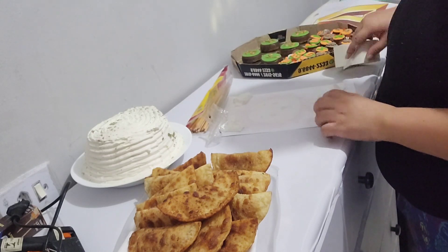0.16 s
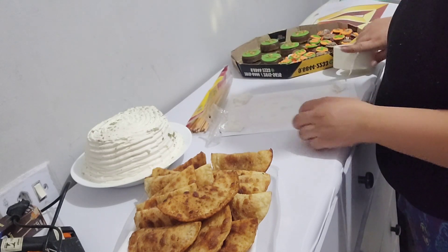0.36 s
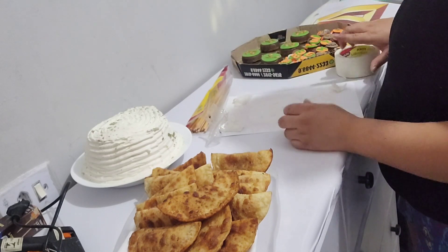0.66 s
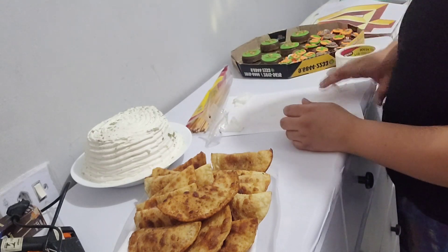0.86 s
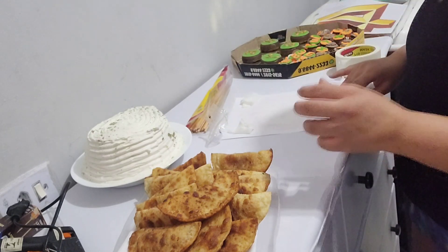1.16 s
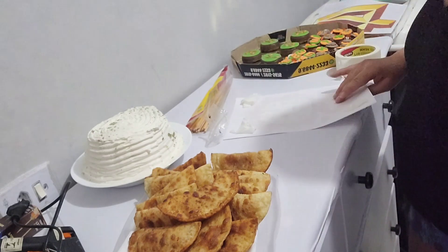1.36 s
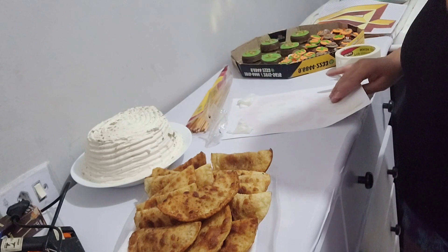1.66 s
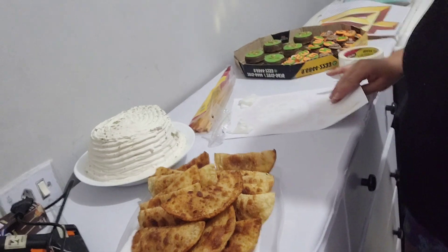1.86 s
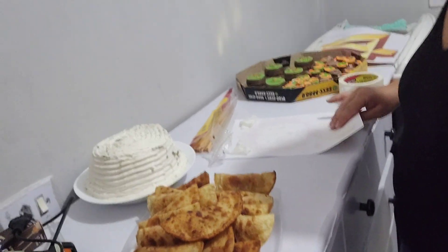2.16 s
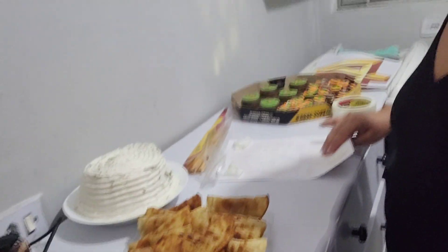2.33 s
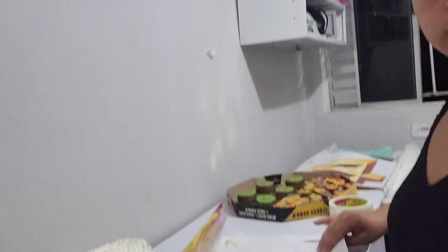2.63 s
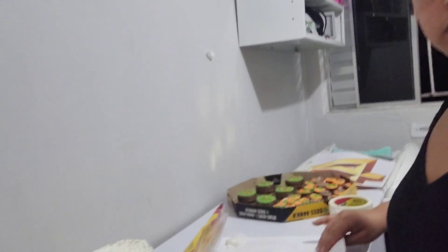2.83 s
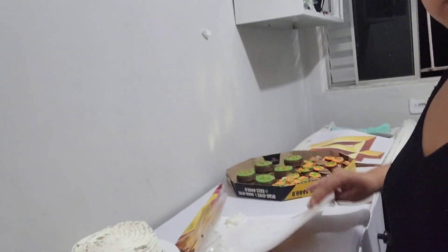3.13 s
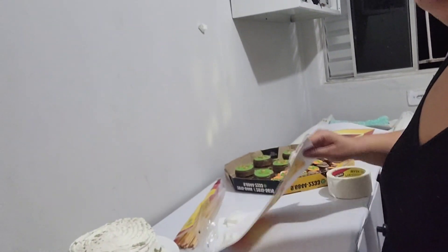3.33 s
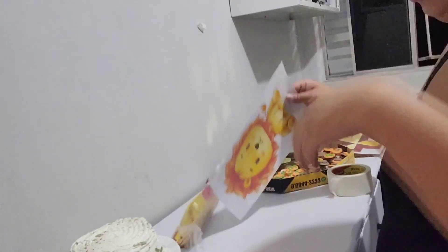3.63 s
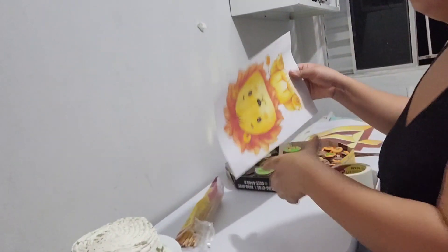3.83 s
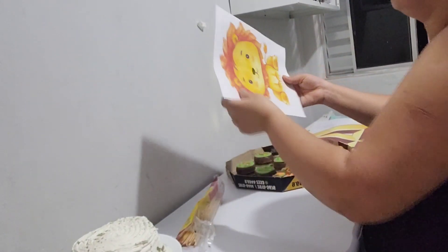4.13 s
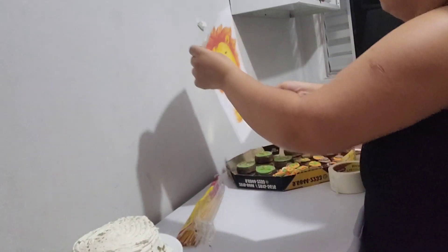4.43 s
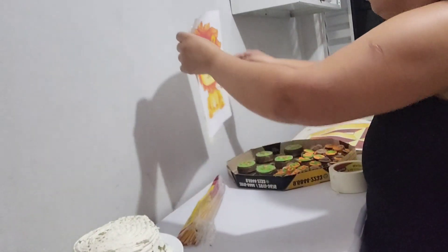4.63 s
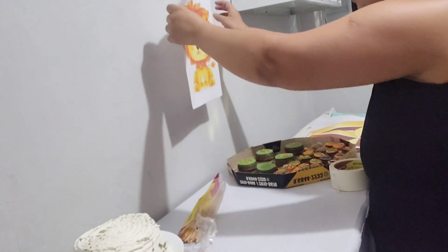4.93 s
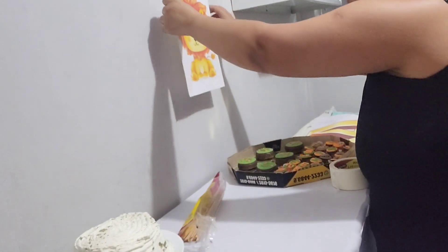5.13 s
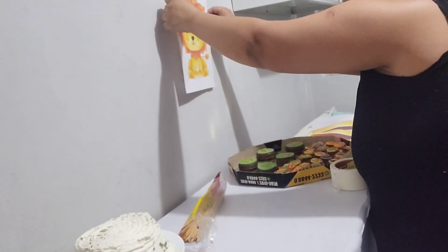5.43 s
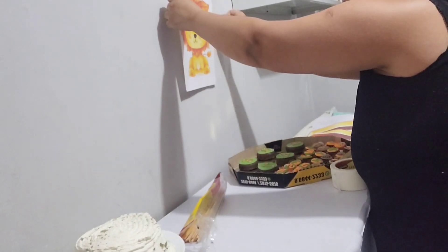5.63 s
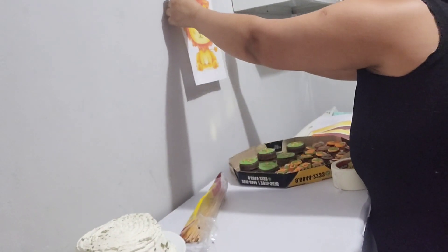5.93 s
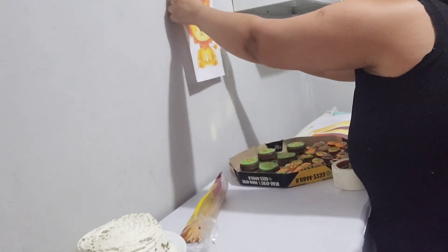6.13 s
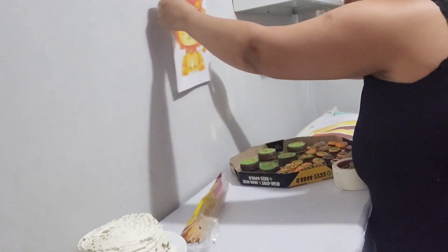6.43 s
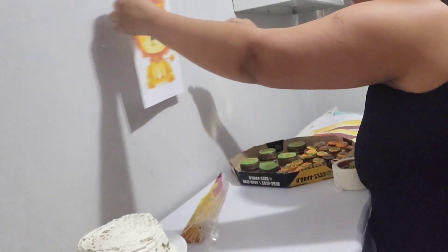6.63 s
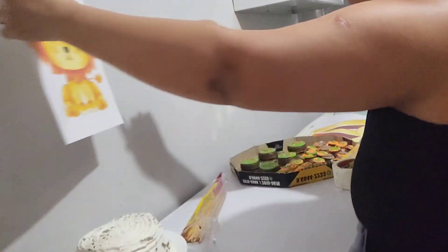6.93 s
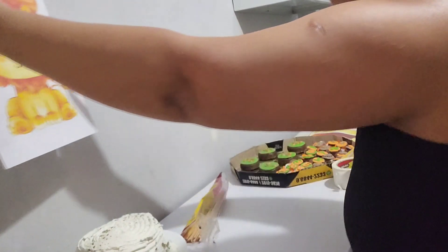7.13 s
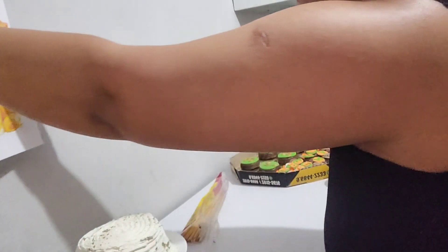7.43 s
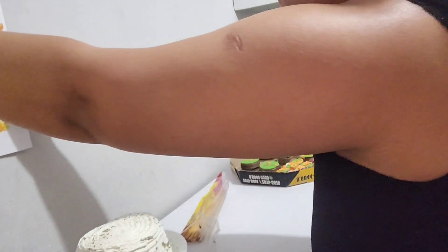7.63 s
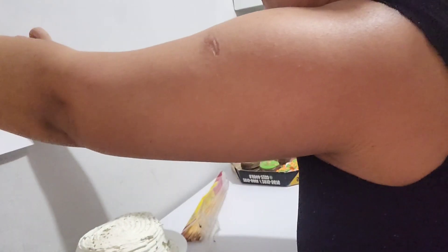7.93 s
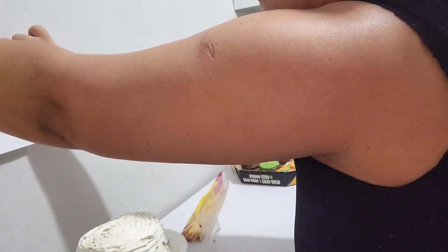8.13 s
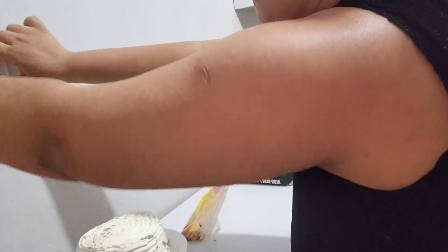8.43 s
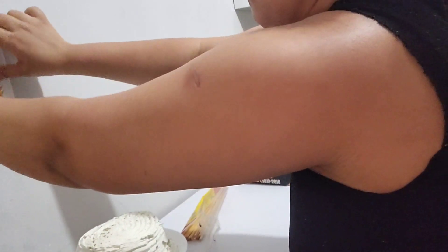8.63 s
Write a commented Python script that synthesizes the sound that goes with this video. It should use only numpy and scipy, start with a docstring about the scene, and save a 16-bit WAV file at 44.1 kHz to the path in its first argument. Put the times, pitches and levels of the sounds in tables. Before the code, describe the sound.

In a small, bare room with quiet air and a low throbbing rumble, a roll of tape knocks on a table and wobbles to rest in a quick hollow clatter. Paper scrapes softly, fingers tick against the hand-held phone, then the sheet peels up with sharp snaps and a bright rustle. Later come sparse brushes, crackles and light taps as it is smoothed onto the wall.

```python
"""A low, throbbing rumble and still air last throughout, in a small, bare room around a hand-held phone.
A roll of packing tape knocks on a table and wobbles to rest: damped modes struck by each contact.
A sheet of paper with tape on its edges is peeled off the tablecloth, lifted and smoothed onto the wall:
grains of friction make its slides and brushes, sudden buckling its snaps. Fingers tick on the phone's
case, mostly stronger at one microphone, and later tap on the wall, nearly centred: damped pulses."""
import sys
import numpy as np
from scipy import signal
from scipy.fft import rfft, irfft, next_fast_len
from scipy.io import wavfile

SR = 44100
rng = np.random.default_rng(int(sys.argv[2]) if len(sys.argv) > 2 else 0)


def waveform_to_disk(signal):
    """Save audio, clipped to [-1, 1], as 16-bit WAV at the path in sys.argv[1]."""
    frames = np.transpose(np.atleast_2d(signal))
    scaled = np.clip(frames, -1, 1) * 32767
    samples = np.round(scaled).astype(np.int16)
    wavfile.write(sys.argv[1], SR, samples)


N = 387198
TIME = np.arange(N) / SR


def undb(db):
    """Amplitude ratio of a level: 20 dB is a factor of ten."""
    return 10 ** (np.asarray(db) / 20)


def unit(x):
    """Normalise to a root-mean-square of 1."""
    return x / np.sqrt(np.mean(x ** 2))


def lookup(points, hz):
    """Read (Hz, value) points on a logarithmic frequency axis, as hearing spaces pitch."""
    f, value = np.transpose(points)
    return np.interp(np.log(hz + 1), np.log(f), value)


def freqs(x):
    """Frequencies in Hz of the discrete spectrum of x."""
    return np.fft.rfftfreq(x.shape[-1], 1 / SR)


def noise(points, size=N, alike_hz=900):
    """Coloured stereo noise: spatial coherence is higher for long waves than for short ones."""
    length = next_fast_len(size, True)
    mid, side = rng.standard_normal((2, length))
    f = freqs(mid)
    apart = np.clip(f / alike_hz, .3, 1)
    mid, side = rfft(mid), rfft(side) * apart
    spectra = np.array([mid + side, mid - side]) * undb(lookup(points, f))
    return unit(irfft(spectra, length)[:, :size])


def walk(rate):
    """Band-limited fluctuation: normal random values, rate per second, joined by straight lines."""
    knots = rng.standard_normal(int(N / SR * rate) + 2)
    return np.interp(TIME * rate, np.arange(len(knots)), knots)


def fade(t, t60):
    """Exponential decay of a damped system: 60 dB in t60 seconds."""
    return undb(-60 * t / t60)


def swell(t, width_s):
    """Gaussian envelope: a smooth rise and fall around t = 0, with this standard deviation."""
    return np.exp(-.5 * (t / width_s) ** 2)


def pan(db):
    """Level difference between left and right (dB), at constant power."""
    gains = undb(np.array([[db], [-db]]) / 2)
    return unit(gains)


def add(out, s, sound):
    """Superpose a sound that begins at s seconds."""
    start = int(s * SR)
    out[:, start:start + sound.shape[1]] += sound[:, :N - start]


def ring(modes, t, scatter_db, apart_hz):
    """Modal superposition after a blow; short waves reach the two microphones further out of phase."""
    hz, db, t60 = np.transpose(modes)[:, :, None]
    chance = rng.standard_normal((3, len(modes), 1))
    phase = chance[1:] * np.minimum(hz / apart_hz, 2)
    amplitude = undb(db + scatter_db * chance[0]) * fade(t, t60)
    return np.sum(amplitude * np.sin(2 * np.pi * hz * t + phase), axis=1)


def room(x, build_s=0.001):
    """Diffuse reverberation of hard, close walls, with unit energy and a decay time for each band."""
    # Each row: frequency in Hz, decay time t60 in seconds.
    decay_times = [(150, 0.35), (1000, 0.25), (4000, 0.25), (8000, 0.11), (15000, 0.31)]
    t = np.arange(SR // 2) / SR
    edges = np.geomspace(80, 18000, 9)
    tail = 0
    for lo, hi in zip(edges, edges[1:]):
        bandpass = signal.butter(3, [lo, hi], "band", fs=SR, output="sos")
        band = signal.sosfilt(bandpass, rng.standard_normal((2, len(t))))
        tail = tail + band * fade(t, lookup(decay_times, np.sqrt(lo * hi)))
    build_up = 1 - np.exp(-(t / build_s) ** 2)
    tail = unit(tail * build_up) / np.sqrt(len(t))
    return signal.fftconvolve(x, tail, axes=1)[:, :N]


def room_tone(air_db=-58.5, echo_db=-7, waver_hz=2.463):
    """Broadband air noise with its reverberation, and narrow hum notes wavering in pitch and level."""
    # Colour of the steady air. Each row: frequency in Hz, relative level in dB.
    air_colour = [(25, -5.5), (60, 17.5), (130, -1.5), (280, 0), (450, -4.5), (720, -2.5), (1100, -15.5),
                  (2000, -27), (3500, -53), (6500, -63), (9000, -34), (16000, -54)]
    # Faint hum in the room. Each row: frequency in Hz, middle level in dB (the first note is shaped below).
    hum = [(177.6, -73.5), (264, -77), (300, -75), (447, -81.5), (528, -78.5)]
    air = noise(air_colour)
    air = unit(air + undb(echo_db) * room(air)) * undb(air_db + 1.0 * walk(5))
    notes = []
    for hz, db in hum:
        level = np.sqrt(2) * undb(db + 5.2 * walk(6))
        phase = 2 * np.pi * np.cumsum(hz + waver_hz * walk(12)) / SR
        notes.append(level * np.sin(phase))
    # the lowest note is held back a little and swells once, at 6.7 s
    lowest_gain = undb(-3.5) + undb(12.5) * swell(TIME - 6.7, .12)
    return air + notes[0] * lowest_gain + sum(notes[1:])


def rumble(boom_hz=57, wander_hz=6, boom_db=-1, waver_db=3, throb_s=0.034,
           upper_db=-59, upper_follows=0.64, upper_limit_db=-49, upper_waver_db=1.14):
    """Frequency and amplitude modulation: a deep boom wavers and throbs; a broad band follows it gently."""
    # Bed of the boom, before boom_db. Each row: time in seconds, level in dB.
    bed_levels = [(0, -60), (.9, -49.5), (1.2, -52), (1.35, -98), (1.6, -53.5), (2.8, -55), (4.4, -55),
                  (5.1, -63.5), (5.55, -63.5), (6.05, -64), (6.6, -54), (7.9, -51), (8.25, -47),
                  (8.65, -42.5)]
    # Strongest throbs, before boom_db. Each row: time of the peak in seconds, level in dB.
    throbs = [(0.98, -46), (1.16, -46), (1.61, -50), (1.88, -45.5), (2.21, -44), (2.62, -45.5),
              (2.76, -49.5), (2.98, -46), (3.13, -45), (3.54, -41.5), (4.151, -42), (4.28, -45.5),
              (4.5, -47), (4.91, -49), (5.49, -47.5), (5.59, -46), (6.26, -45.5), (6.42, -40.5),
              (7.02, -42), (7.28, -47.5), (7.43, -47.5), (7.8, -43), (8.5, -45)]
    # Colour of the upper rumble. Each row: frequency in Hz, relative level in dB.
    upper_colour = [(20, -12), (40, -29), (80, 11), (115, 10.5), (175, -2), (220, -3.5), (290, 5),
                    (500, -7), (900, -37)]
    bed = undb(np.interp(TIME, *np.transpose(bed_levels)) + waver_db * walk(14))
    throb_power = sum((undb(db) * swell(TIME - s, throb_s)) ** 2 for s, db in throbs)
    level = np.sqrt(bed ** 2 + throb_power)
    phase = 2 * np.pi * np.cumsum(boom_hz + wander_hz * walk(22)) / SR
    boom = np.sqrt(2) * np.sin(phase) * level * undb(boom_db)
    # a limit and an exponent below 1 compress the throbs
    followed = np.minimum(level, undb(upper_limit_db)) ** upper_follows
    upper_envelope = unit(followed * undb(upper_waver_db * walk(12)))
    upper = noise(upper_colour) * upper_envelope * undb(upper_db)
    return boom * pan(-2.8) + upper


def paper_slide(hiss_db=0, scrape_db=-2, held_db=-83.5, rise_share=0.3, runout_t60=0.31,
                grain_db=5, flutter_db=2, room_db=1, sheen_hz=8000, brisk_db=-62,
                crinkles_per_s=35, crinkle_db=10, crinkle_t60=0.0039, drift_db=2):
    """Stick-slip friction: fibres release a dense stream of grains, with crinkles standing out at random."""
    # Paper on cloth, fingers and wall. Each row: start in seconds, length in seconds,
    # hiss level in dB and scrape level in dB (before hiss_db and scrape_db).
    slides = [(0.122, 0.49, -65.5, -59.5), (0.237, 0.18, -55, -58.5), (0.694, 0.11, -71, -77),
              (0.947, 0.12, -62, -63), (1.71, 0.33, -75.5, -70), (2.32, 0.19, -74, -66),
              (2.524, .19, -66.5, -65.5), (2.738, 0.15, -90, -68), (3.121, 0.13, -65, -63),
              (3.268, .2, -71, -63), (3.43, 0.35, -56, -55), (3.88, 0.057, -67, -56),
              (4.045, 0.27, -59.5, -57.5), (4.333, 0.18, -68.5, -71), (4.667, .2, -70.5, -70.5),
              (5.028, 0.19, -73, -81), (5.237, 0.2, -60.5, -86), (5.433, 0.062, -53, -54.5),
              (5.74, 0.14, -69.5, -72), (6.14, .54, -65.5, -76), (6.575, 0.29, -65, -68.5),
              (6.746, 0.1, -56.5, -76), (7.05, 0.16, -79.5, -88), (7.322, 0.074, -76, -88),
              (7.585, 0.5, -72, -62.5), (7.684, .07, -67, -63.5), (8.137, 0.11, -58, -63),
              (8.275, .2, -63, -79), (8.521, 0.22, -57, -63)]
    # Colours of the light hiss and the firmer scrape. Each row: frequency in Hz, relative level in dB.
    hiss_colour = [(1500, -2), (3000, -4), (4800, 6.5), (6500, 4.5), (8500, 0), (12000, 3.5), (16000, -2.5)]
    scrape_colour = [(300, 17.5), (700, 2), (1400, 8.5), (2600, -1), (4000, -4), (8000, -16)]
    # the sheet whispers even when it is only held
    power = np.full((2, N), undb(held_db) ** 2)
    for s, length, *levels in slides:
        t = np.arange(int((length + runout_t60) * SR)) / SR
        rise = np.minimum(t / (rise_share * length), 1)
        shape = rise * fade(np.maximum(t - length, 0), runout_t60)
        add(power, s, (undb(levels)[:, None] * shape) ** 2)
    out = 0
    for colour, level, trim_db in zip((hiss_colour, scrape_colour), np.sqrt(power), (hiss_db, scrape_db)):
        catches = (rng.random(N) < crinkles_per_s / SR) * rng.exponential(size=N)
        crinkles = signal.lfilter([undb(crinkle_db)], [1, -fade(1 / SR, crinkle_t60)], catches)
        unevenness = undb(grain_db * walk(900) + flutter_db * walk(45))
        grains = unit(noise(colour) * (unevenness + crinkles))
        brisk = unit(grains + undb(room_db) * room(grains))
        # a slow slide, taken as a quiet one, has less above sheen_hz
        slow = irfft(rfft(brisk) / (1 + (freqs(brisk) / sheen_hz) ** 8), N)
        speed = np.minimum((level / undb(brisk_db)) ** .25, 1)
        # brightness also drifts at random, for the changing angle of the sheet
        brightness = speed * undb(drift_db * walk(9))
        out = out + (slow + brightness * (brisk - slow)) * level * undb(trim_db)
    return out


def tape_roll(clack_db=-4, clack_t60=0.048, room_db=-17, clack_room_db=0):
    """Impact excitation of modes: the table booms, the cardboard core rings, the contact clacks."""
    # The rim meets the table. Each row: time in seconds, table drive in dB, core drive in dB,
    # corner in Hz above which the contact excites the modes less and less (capped at SR / 4).
    knocks = [(0.122, -23, -24, 6000), (0.1331, -31, -36.5, 3020), (0.5421, -26, -23, 2630),
              (0.5541, -24, -32.5, 700), (0.5671, -59, -36, 2200), (0.5945, -25.5, -32, 2800),
              (0.619, -45, -38, 1100), (0.654, -28, -25.5, 1040), (0.6905, -33.5, -33.5, 1010),
              (0.703, -35, -26, 700), (0.729, -47, -36, 2260), (0.7431, -27, -23.5, 1160),
              (0.7616, -31.5, -29, 1270), (0.769, -33, -48, 1500), (0.785, -47, -42, 1330),
              (0.802, -38.5, -45, 1300), (1.789, -44, -45, 900), (1.951, -46.5, -41, 905)]
    # Modes of the table top. Each row: frequency in Hz, middle level in dB, t60 in seconds.
    table_modes = [(58.2, -7.5, 0.38), (116, -19, 0.51), (141.2, -4, 0.28), (166.5, 1, 0.24),
                   (257.8, -12, 0.23), (280.5, -9.5, 0.094)]
    # Modes of the cardboard core. Each row: frequency in Hz, middle level in dB, t60 in seconds.
    core_modes = [(340, -3.5, 0.15), (423, -5.5, 0.089), (436, -4.5, 0.097), (467, -2.5, 0.051),
                  (497, -15, 0.13), (565, -21, 0.12), (723, -16, 0.15), (763, -9.5, 0.2), (897, -17.5, 0.3),
                  (916, -20.5, 0.14), (1240, -28, 0.11), (1550, -26, 0.086)]
    # Colour of the crowd of short-lived modes. Each row: frequency in Hz, relative level in dB.
    clack_colour = [(100, -3), (250, 6.5), (500, 5), (1000, -4.5), (2000, -8), (3500, -14.5), (7000, -22.5),
                    (15000, -27)]
    dry, send = np.zeros((2, N)), np.zeros((2, N))
    t = np.arange(int(SR * .4)) / SR
    onset = 1 - np.exp(-t / 0.0018)
    for s, table_db, core_db, contact_hz in knocks:
        top = undb(table_db) * ring(table_modes, t, scatter_db=3.5, apart_hz=796)
        core = undb(core_db) * ring(core_modes, t, scatter_db=2.5, apart_hz=734)
        clack = undb(core_db + clack_db) * noise(clack_colour, len(t)) * fade(t, clack_t60)
        # a soft, rolling contact leaves the high modes nearly still
        contact = signal.butter(2, min(contact_hz, SR / 4), fs=SR, output="sos")
        body, clack = signal.sosfilt(contact, onset * np.array([top + core, clack]))
        add(dry, s, body + clack)
        add(send, s, undb(room_db) * body + undb(clack_room_db) * clack)
    return (dry + room(send)) * pan(-.4)


def paper_brushes(grain_db=5, width_octaves=0.88, dry_db=-4, wet_db=-2):
    """Granular friction noise: short strokes, flaps and pats swell and sink, each around its own pitch."""
    # Each row: time of the peak in seconds, level in dB (before dry_db and wet_db), centre in Hz,
    # standard deviation of the swell in seconds.
    brushes = [(0.48, -49, 6800, 0.004), (0.985, -51.5, 8540, 0.023), (1.97, -54, 1300, 0.02),
               (2.455, -56.5, 7950, 0.0095), (3.03, -70, 900, 0.083), (3.257, -53, 1020, 0.013),
               (3.409, -60.5, 700, 0.013), (3.57, -45.5, 6950, 0.014), (3.563, -44, 383, 0.0081),
               (3.655, -54.5, 620, 0.012), (3.925, -55, 596, 0.0089), (4.269, -53, 350, 0.011),
               (5.299, -65, 5850, .026), (5.477, -51, 5330, 0.012), (5.77, -49.5, 11900, 0.0063),
               (5.979, -65, 6500, 0.034), (6.141, -51, 3800, 0.015), (6.655, -53, 3970, 0.0051),
               (7.732, -54.5, 10100, 0.0082), (7.78, -65.5, 2300, 0.014), (7.977, -55.5, 4940, .012),
               (8.041, -48, 119, 0.011), (8.156, -53.5, 3360, 0.017), (8.204, -45.5, 2580, .014),
               (8.401, -50, 119, 0.025), (8.69, -56.5, 2600, 0.049)]
    out = np.zeros((2, N))
    for s, db, hz, swell_s in brushes:
        t = np.arange(-SR // 6, SR // 6) / SR
        white = rng.standard_normal((2, len(t)))
        colour = swell(np.log2((freqs(white) + 1) / hz), width_octaves)
        uneven = white * undb(grain_db * walk(700)[:len(t)])
        grains = unit(irfft(rfft(uneven) * colour, len(t)))
        add(out, s + t[0], undb(db) * grains * swell(t, swell_s))
    return undb(dry_db) * out + undb(wet_db) * room(out)


def paper_snaps(ring_db=-7.5, wet_db=-4, click_db=3.5, click_t60=0.00084, crinkle_db=4):
    """Snap-through buckling: a sharp click, a crinkle and a papery ring, answered by the walls."""
    # The sheet buckles or the tape lets go. Each row: time in seconds, level in dB, pitch in Hz
    # that sets the band, t60 of the crinkle in seconds, left minus right in dB.
    snaps = [(0.965, -50, 8400, 0.051, -10), (1.892, -56, 3930, .006, 3), (2.3208, -38.5, 2400, 0.0071, -3),
             (2.347, -41.5, 2700, .008, 1), (2.370, -38, 8400, .003, 10), (2.492, -59, 9000, .006, 4),
             (2.6456, -36, 3700, 0.0085, 4), (3.541, -37, 7000, 0.09, 1), (3.556, -37, 4000, 0.076, 0),
             (3.637, -28.5, 2880, 0.016, 2), (3.7059, -46, 3060, 0.02, 10), (3.7553, -46, 6800, .03, -8),
             (3.765, -43.5, 2900, 0.024, -5), (3.894, -58.5, 5900, 0.068, 4), (4.261, -43, 2800, 0.08, 1),
             (5.453, -47, 7300, 0.069, -15), (5.756, -58, 12000, 0.052, -14),
             (6.1332, -36.5, 5500, 0.013, -2), (7.698, -55.5, 5850, 0.05, 11), (7.728, -49, 3950, 0.034, 0),
             (8.028, -49.5, 6500, 0.012, 6)]
    # Ring of the sheet before it bends. Each row: frequency in Hz, middle level in dB, t60 in seconds.
    sheet_modes = [(970, -6.5, 0.026), (1380, -12, 0.014), (2200, -7, 0.0065), (2920, -2, 0.0051),
                   (4210, -10.5, 0.026), (4860, -7, 0.0077), (5195, -7, .01)]
    dry, send = np.zeros((2, N)), np.zeros((2, N))
    t = np.arange(SR // 10) / SR
    for s, db, hz, crinkle_t60, pan_db in snaps:
        # curvature changes the stiffness of the sheet, so its ring moves
        bend = 2 ** rng.uniform(-0.21, 0.22)
        modes = [(f * bend, level, t60) for f, level, t60 in sheet_modes]
        unevenness = undb(crinkle_db * walk(1770)[:len(t)])
        crinkle = rng.standard_normal((2, len(t))) * unevenness * fade(t, crinkle_t60)
        papery = undb(ring_db) * ring(modes, t, scatter_db=2.5, apart_hz=2600)
        band = signal.butter(1, [hz / 3.0, min(hz * 1.4, SR / 2 - 2000)], "band", fs=SR, output="sos")
        snap = signal.sosfilt(band, crinkle + papery)
        snap /= np.sqrt(np.mean(snap[:, :SR // 500] ** 2))  # its first 2 ms set the level
        # the higher the buckle, the stronger its click
        click = undb(click_db) * hz / 6000 * rng.standard_normal((2, len(t))) * fade(t, click_t60)
        add(dry, s, undb(db) * (snap + click) * pan(pan_db))
        add(send, s, undb(db) * snap)
    return dry + undb(wet_db) * room(send)


def finger_ticks(edge_db=-21, edge_t60=0.0083, cycles=5.4, longest_s=0.0069):
    """Heavily damped resonance: ticks on the phone's case, mostly one-sided, then wall taps near the centre."""
    # Each row: time in seconds, relative level in dB, pitch in Hz, left minus right in dB.
    ticks = [(1.9424, -30, 1340, -21), (1.946, -34, 1250, -5), (1.951, -29.5, 603, -4),
             (1.957, -21.5, 1700, -23), (1.978, -42, 3000, -6), (1.9882, -22.5, 1340, -27),
             (2.010, -26.5, 1170, -27), (2.012, -26, 1080, 5), (2.0845, -40.5, 1440, -17),
             (2.210, -29.5, 950, -29), (2.2192, -33, 940, -23), (2.293, -37.5, 1220, -24),
             (5.8314, -19, 247, 24), (8.028, -35, 854, -4), (8.315, -48, 1110, -2), (8.393, -49, 915, -4),
             (8.627, -45, 1210, -5), (8.63, -35.5, 750, -3), (8.707, -42.5, 1040, 0),
             (8.774, -42.5, 840, -1)]
    out, t = np.zeros((2, N)), np.arange(SR // 20) / SR
    for s, db, hz, pan_db in ticks:
        # a tick dies within a few cycles, or sooner under the finger
        t60 = min(cycles / hz, longest_s)
        onset = 1 - np.exp(-t * hz * 9)
        pulse = np.cos(2 * np.pi * hz * t) * fade(t, t60) * onset
        edge = undb(edge_db) * rng.standard_normal((2, len(t))) * fade(t, edge_t60)
        add(out, s, undb(db) * pan(pan_db) * (1.29 * pulse + edge))
    return signal.sosfilt(signal.butter(1, 6000, fs=SR, output="sos"), out)  # skin is soft


def scene():
    """Linear superposition of the room's air, rumble, roll, paper and finger ticks."""
    background = room_tone() + rumble()
    paper = paper_slide() + paper_brushes() + paper_snaps()
    return background + tape_roll() + paper + finger_ticks()


def record(dry, lowest_hz=30, top_hz=16000):
    """Linear filtering: each microphone port adds its colour; the phone cuts the deepest bass and the top."""
    # Each row: frequency in Hz, left minus right in dB.
    ports = [(2000, -1), (4400, 4.5), (8000, -3), (15000, -1)]
    balance = undb(np.array([[.5], [-.5]]) * lookup(ports, freqs(dry)))
    coloured = irfft(rfft(dry) * balance, N)
    heard = signal.sosfilt(signal.butter(2, lowest_hz, "high", fs=SR, output="sos"), coloured)
    return signal.sosfilt(signal.ellip(10, .2, 80, top_hz, fs=SR, output="sos"), heard)


dry = scene()
out = record(dry)
waveform_to_disk(out)
```